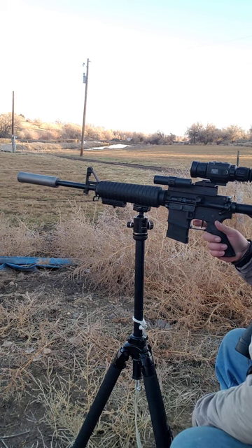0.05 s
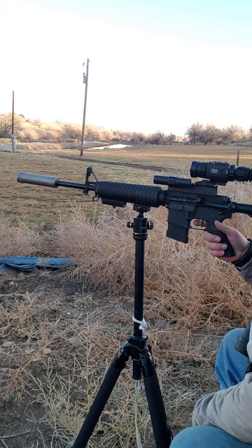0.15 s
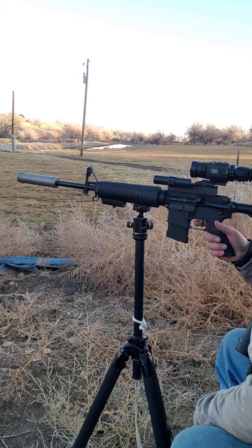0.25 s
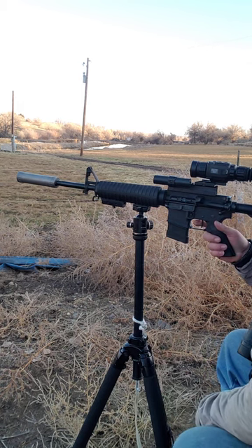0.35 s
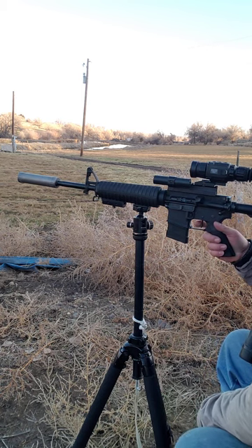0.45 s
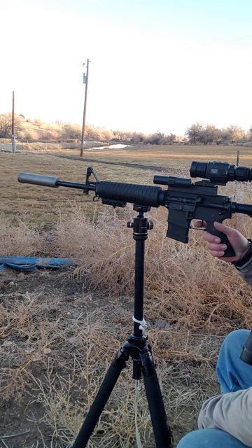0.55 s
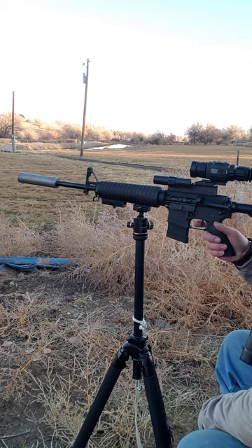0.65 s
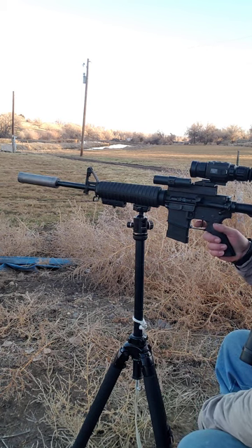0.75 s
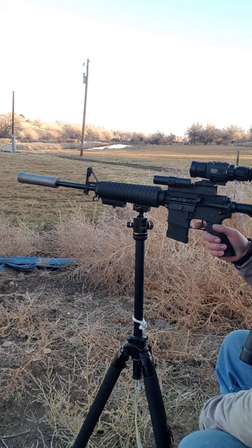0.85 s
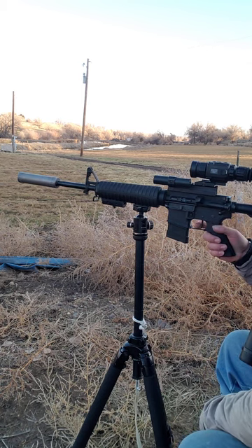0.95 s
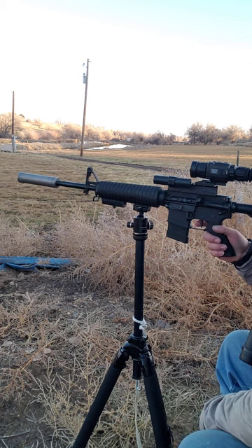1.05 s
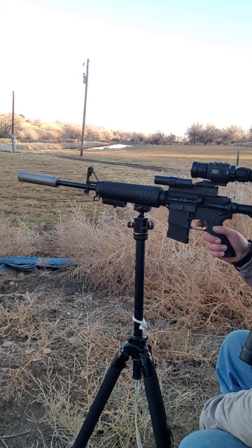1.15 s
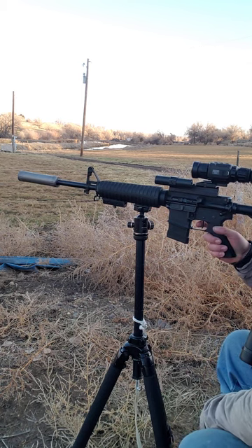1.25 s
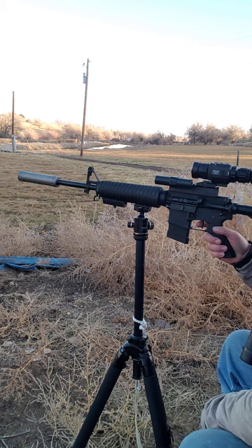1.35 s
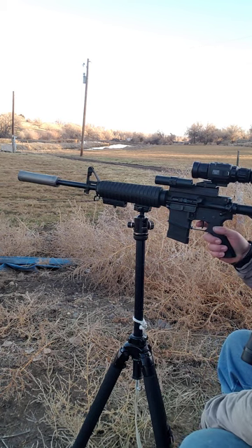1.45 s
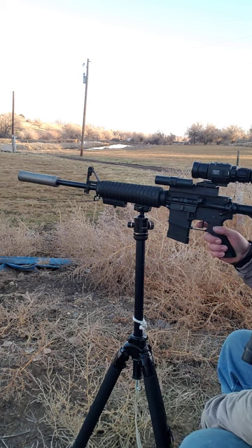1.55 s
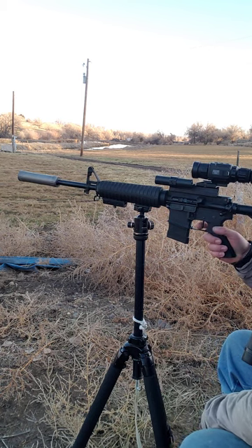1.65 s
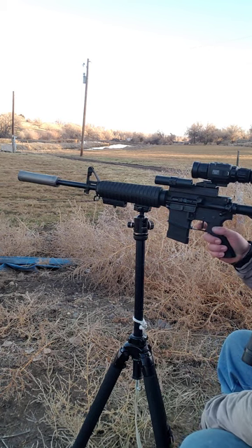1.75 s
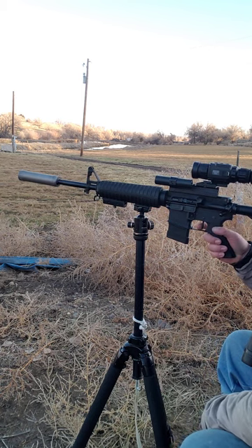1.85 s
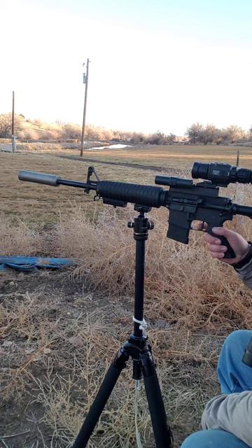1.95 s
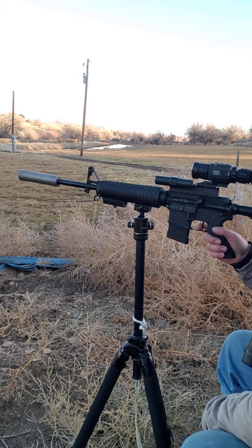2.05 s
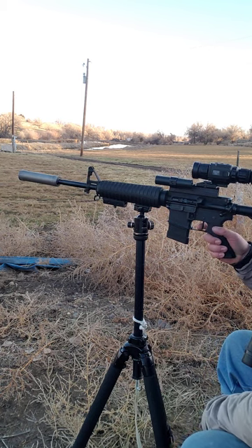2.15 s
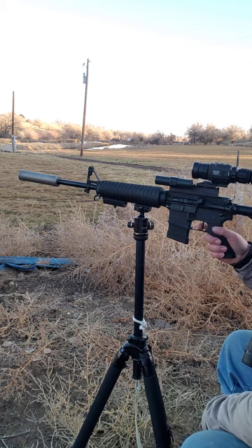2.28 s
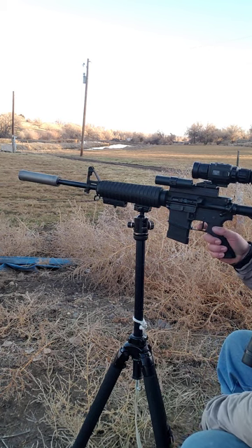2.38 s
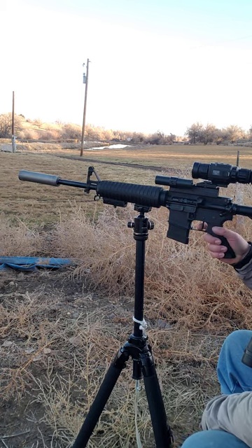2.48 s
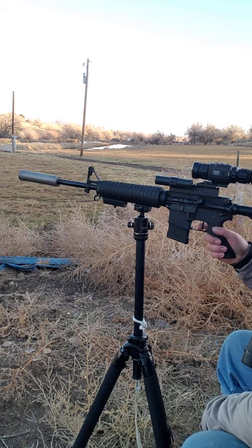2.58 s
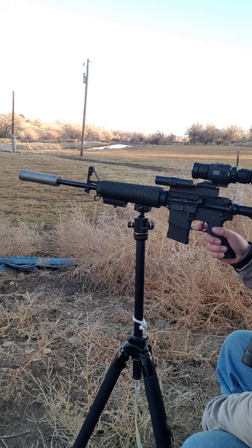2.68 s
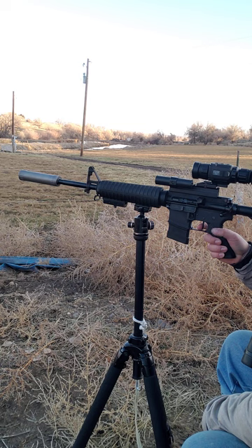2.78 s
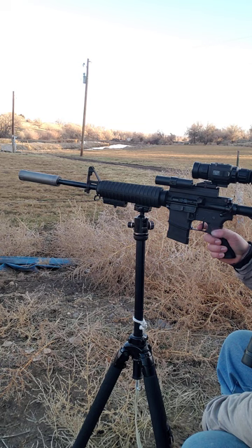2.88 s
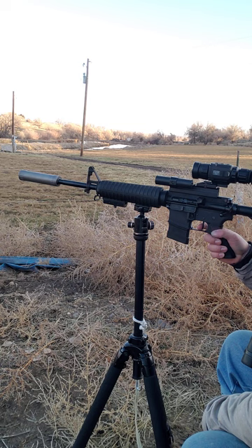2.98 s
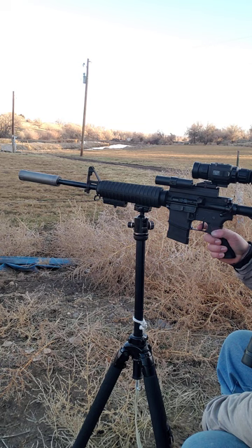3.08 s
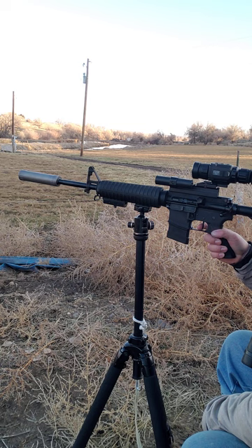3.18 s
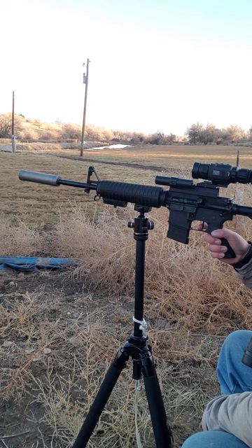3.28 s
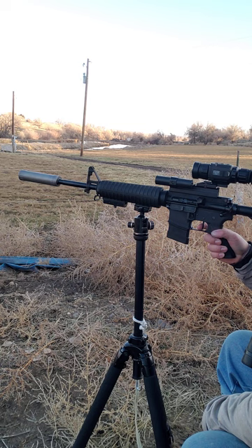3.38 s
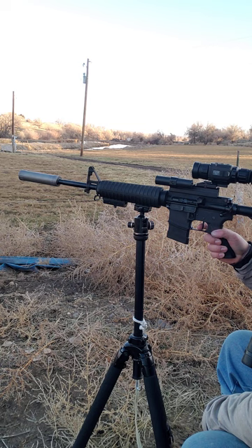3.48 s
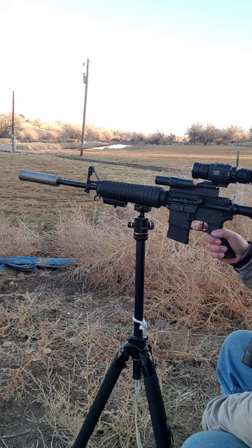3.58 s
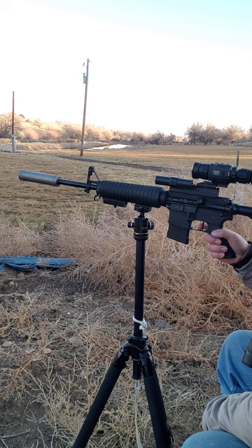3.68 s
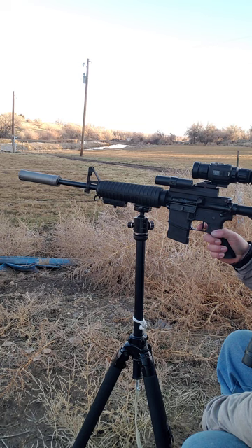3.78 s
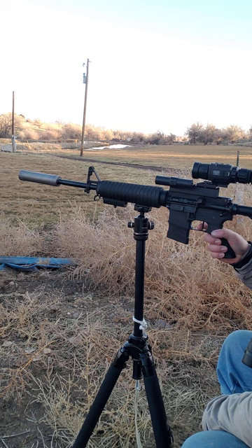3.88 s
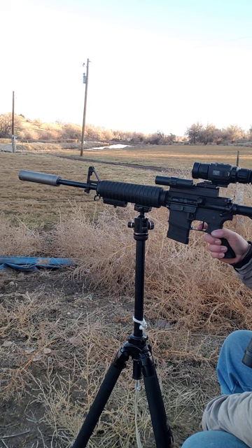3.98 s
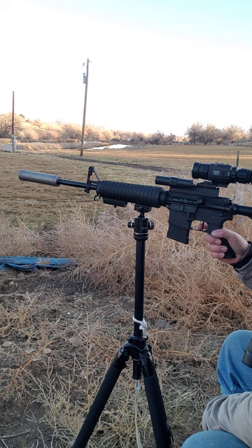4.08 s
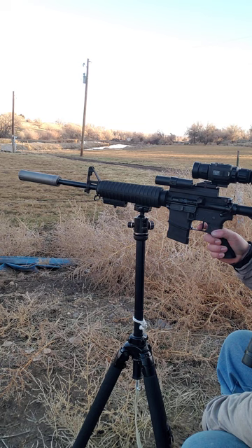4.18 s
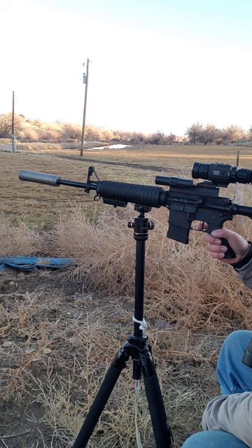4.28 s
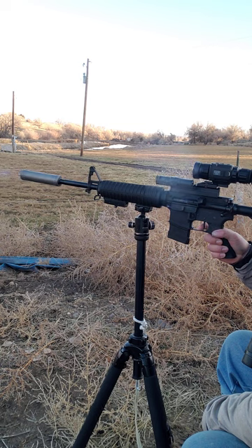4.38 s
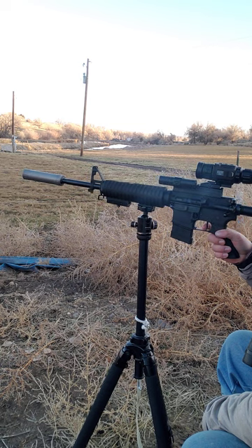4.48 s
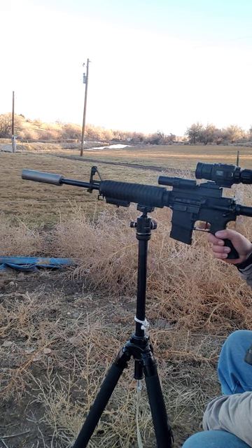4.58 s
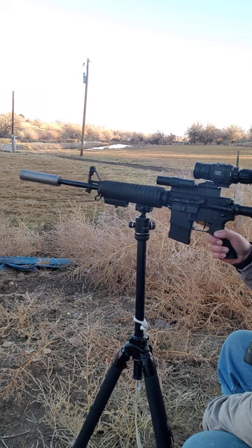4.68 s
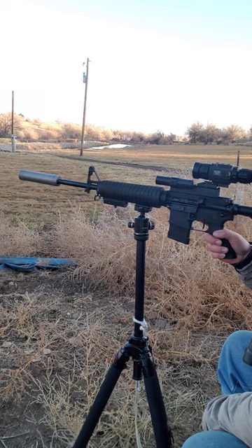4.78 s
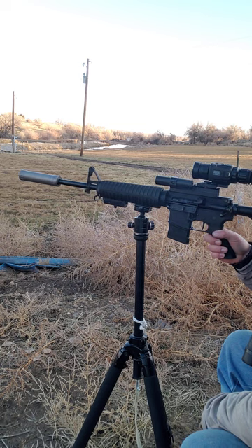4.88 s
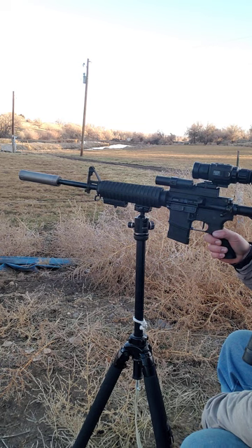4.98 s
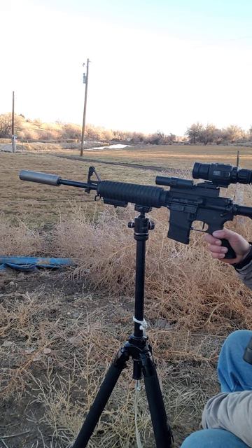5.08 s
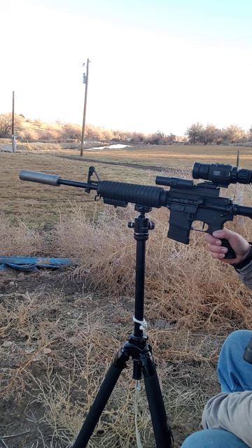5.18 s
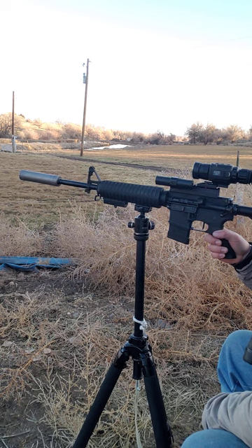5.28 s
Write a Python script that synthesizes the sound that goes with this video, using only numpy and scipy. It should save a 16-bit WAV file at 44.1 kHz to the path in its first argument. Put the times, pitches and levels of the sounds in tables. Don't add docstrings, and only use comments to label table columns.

```python
import sys
import numpy as np
from scipy import signal
from scipy.fft import irfft
from scipy.io import wavfile
from scipy.ndimage import uniform_filter1d

SR = 44100
rng = np.random.default_rng(int(sys.argv[2]) if len(sys.argv) > 2 else 0)


def materialize(psi):
    bounded = np.clip(np.atleast_2d(psi).T, -1, 1)
    quanta = np.round(bounded * 32767).astype(np.int16)
    wavfile.write(sys.argv[1], SR, quanta)


N = 235475
SHOT_S = 4.452


def undb(db):
    return 10 ** (np.asarray(db) / 20)


def read(points, hz):
    f, value = np.transpose(points)
    return np.interp(np.log(hz + 1), np.log(f + 1), value)


def curve(rows, t):
    s, *columns = np.transpose(rows)
    return [np.interp(t, s, c) for c in columns]


def add(mix, s, sound):
    part = mix[:, round(s * SR):][:, :sound.shape[-1]]
    part += sound[..., :part.shape[-1]]


def drift(t, top_hz):
    f = np.geomspace(.2, top_hz, num=24)[:, None]
    x = (np.sin(2 * np.pi * (f * t + rng.random(f.shape))) / np.sqrt(f)).sum(0)
    return x / x.std()


def pair(shape, same, lean_db):
    a, b, c, d = rng.standard_normal((4, *shape))
    same = np.clip(same, -1, 1)
    shared, own = a + 1j * b, c + 1j * d
    left = shared * undb(lean_db / 2)
    right = (same * shared + np.sqrt(1 - same ** 2) * own) / undb(lean_db / 2)
    return np.array([left, right])


# (frequency [Hz], correlation [-1 to 1])
COHERENCE = [(60, 0.98), (300, 0.94), (700, 0.85), (1500, 0.81), (2500, .2), (3500, -.2), (5000, -.1),
             (9000, -0.098)]


def field(colour_db, lean, size, patchy_db):
    hz = np.fft.rfftfreq(size, 1 / SR)[:, None]
    t = np.arange(4 * N // size + 5) * size / 4 / SR
    patches = rng.standard_normal((len(hz), len(t)))
    patches = uniform_filter1d(patches, size=size // 64, axis=0)
    patches = uniform_filter1d(patches, size=8192 // size, axis=1)
    gain = undb(colour_db(hz, t) + patchy_db * patches / patches.std())
    z = pair(patches.shape, read(COHERENCE, hz), read(lean, hz)) * gain
    return signal.istft(z * np.sqrt(3 / size), nperseg=size, noverlap=size * 3 // 4)[1][:, :N]


def unit(points, hz):
    db = read(points, hz)
    return db - 10 * np.log10(np.mean(undb(2 * db)))


def puff(colour_db, same, lean_db, db, rise, t60):
    t = np.arange(8192) / SR
    x = irfft(pair((4097,), same, lean_db) * undb(colour_db))
    decay = undb(db - 60 * np.maximum(t - rise, 0) / t60)
    attack = np.sin(np.pi / 2 * np.minimum(t / rise, 1)) ** 2
    return decay * attack * x / x.std()


def ring(modes, lean_db):
    t = np.arange(SR // 3) / SR
    out = np.zeros((2, len(t)))
    lean = np.array([[lean_db], [-lean_db]]) / 2
    for hz, db, t60 in modes:
        out += undb(db - 60 * t / t60 + lean) * np.sin(2 * np.pi * (hz * t + rng.random((2, 1))))
    return out * np.minimum(t / .001, 1)


# (frequency [Hz], left minus right [dB])
SHOT_LEAN = [(300, 0.5), (3000, 4), (7500, -2.5), (10000, -1), (15500, -5)]


def bands(events):
    out, hz = np.zeros((2, N)), np.fft.rfftfreq(8192, 1 / SR)
    for s, db, rise, t60, centre_hz, octaves, lean_db in events:
        colour_db = -6.5 * (np.log2((hz + 1) / centre_hz) / octaves) ** 2
        add(out, s, puff(colour_db, read(COHERENCE, hz), lean_db + read(SHOT_LEAN, hz), db, rise, t60))
    return out


# (frequency [Hz], density [dB per Hz])
WASH = [(150, -29), (260, -3), (400, -8.5), (550, -16), (800, -5), (1500, -6.5), (1900, -25.5),
        (2350, -10.5), (2800, -30.5), (3500, -29), (5000, -38), (7800, -33.5), (8250, -46), (12200, -33.5)]
# (time [s], level [dB])
ROAD = [(0, -61.5), (.45, -62), (1.1, -63), (1.7, -63.5), (2.3, -60.5), (2.8, -59.5), (3.3, -59.5),
        (3.55, -62), (3.8, -60.5), (4.43, -62)]
# (frequency [Hz], left minus right [dB])
HISS_LEAN = [(100, 4.5), (1700, -1.5), (3000, -1.5), (6000, 3), (7600, 20), (8300, 2), (15000, -2)]
# (time [s], half length [s], tyre drone [dB])
LORRIES = [(0, 0.13, 5.5), (.55, 0.34, -5.5), (1.85, 0.36, 6.5), (2.8, 0.52, 5), (3.848, 0.45, 11.5),
           (4.401, 0.25, 8)]
# (time [s], level [dB])
CHORUS = [(0, 5), (1.78, 5.5), (2.75, 3), (3.35, 2.5), (4.1, 2.5)]
DRONE_DB = -6.5
TILT_START_DB, BRIGHTEN_DB_PER_S = -1.98, 0.65
INSECT_DB, CHORUS_FADE_S = 1.5, .6


def wash():
    def colour_db(hz, t):
        tilt_db = TILT_START_DB + BRIGHTEN_DB_PER_S * t
        drone_db = DRONE_DB + sum(db * np.exp(-((t - s) / half) ** 2) for s, half, db in LORRIES)
        insect_db = INSECT_DB + sum(db * (t > s) * np.exp(-abs(t - s) / CHORUS_FADE_S) for s, db in CHORUS)
        swell_db = curve(ROAD, t)[0] + 62.34 + 0.65 * drift(t, top_hz=8)
        swell_db = swell_db + tilt_db * np.log2((hz + 1) / 1100)
        swell_db = swell_db + drone_db * np.exp(-((hz - 280) / 130) ** 2)
        road_db = swell_db / (1 + (hz / 3000) ** 4)
        return unit(WASH, hz) - 63 + road_db + insect_db * np.exp(-((hz - 7200) / 900) ** 2)
    return field(colour_db, HISS_LEAN, size=1024, patchy_db=0.5)


# (time [s], length [s], start [Hz], end [Hz], level [dB])
BIRDS = [(1.849, 0.14, 2260, 2350, -78.5), (2.054, 0.14, 2420, 2390, -77), (2.14, 0.17, 2250, 2030, -74),
         (2.556, 0.12, 2360, 2330, -70), (2.647, 0.18, 2300, 2204, -71.5), (3.081, .2, 2096, 2064, -73),
         (3.259, 0.087, 1560, 1544, -67), (3.307, .12, 2310, 2420, -84), (3.659, 0.16, 2395, 2390, -70.5),
         (3.82, 0.11, 2300, 2140, -84), (4.07, 0.14, 2420, 2430, -79.5), (4.147, 0.17, 2200, 2196, -74),
         (4.239, 0.12, 2300, 2250, -83), (4.334, 0.084, 2270, 2160, -83)]


def birds():
    out = np.zeros((2, N))
    lowpass = signal.butter(2, 42, fs=SR, output="sos")
    for s, length, start_hz, end_hz, db in BIRDS:
        t = np.arange(0, length, 1 / SR)
        paths = signal.sosfilt(lowpass, pair((len(t) + 2000,), 0.7, 0))[:, 2000:]
        flutter = 1.03 + paths / paths.std()
        tone = np.exp(2j * np.pi * np.cumsum(np.linspace(start_hz, end_hz, len(t))) / SR)
        add(out, s, undb(db + 2.0) * np.hanning(len(t)) ** 0.35 * (flutter * tone).real)
    return out


# (time [s], level [dB], t60 [s], centre [Hz], width [octaves])
RUSTLES = [(0, -66, .018, 3500, 2.4), (.023, -59.5, 0.08, 6500, .32), (.0235, -57, .065, 13000, .23),
           (.03, -70, 0.48, 5900, 1.9), (.272, -37.5, .09, 75, 0.33), (1.488, -77, .15, 3300, .3),
           (1.49, -76.5, .13, 5700, .25)]
# (time [s], level [dB], left minus right [dB])
TICKS = [(.594, -74, 2), (.617, -75, 4), (.657, -76.5, 0), (.682, -75.5, 0), (.729, -76, 6),
         (1.835, -75, 8)]
# (rise [s], t60 [s], centre [Hz], width [octaves])
TICK = (.0011, .018, 5700, .25)
RUSTLE_RISE, RISE_CYCLES, RUSTLE_LEAN_DB = 0.021, 1.4, -3


def rustles():
    events = [(s, db, *TICK, lean_db) for s, db, lean_db in TICKS]
    for s, db, t60, hz, octaves in RUSTLES:
        rise = RUSTLE_RISE * t60 + RISE_CYCLES / hz
        events.append((s, db, rise, t60, hz, octaves, RUSTLE_LEAN_DB))
    return bands(events)


# (time [s], level [dB])
IDLE = [(0, -40.5), (.07, -41.5), (.84, -42.5), (1.47, -43.5), (1.78, -41), (3.28, -41), (4.42, -39.5)]
# (multiple of the cycle rate [-], level [dB])
FIRING = [(3, -31), (4, -14), (5, -20.5), (6, -22.5), (7, -17.5), (8, -1.5), (9, -16), (10, -25.5),
          (11, -20), (12, -7.5), (13, -14), (14, -20.5), (15, -31), (16, -37), (17, -39.5), (18, -33.5)]
# (frequency [Hz], density [dB per Hz])
RUMBLE = [(20, -23.5), (40, -11), (55, 1), (85, -5), (130, -9.5), (210, -10), (330, -29.5), (600, -71)]
RUMBLE_DB = -55
IDLE_HZ = 102.98


def engine():
    now, t = np.arange(N) / SR, np.arange(0, N + 64, 64) / SR
    turns = now * IDLE_HZ / 8
    tone = np.zeros(N)
    for order, order_db in FIRING:
        waver = np.interp(now, t, drift(t, top_hz=9)) * (.5 - .04 * order_db)
        slip = np.interp(now, t, drift(t, top_hz=6)) * (.004 - .0003 * order_db)
        shift = .42 * (order < 12 and order != 8)
        tone += undb(order_db + waver) * np.sin(2 * np.pi * (order * turns + slip + shift))

    def rumble_db(hz, s):
        return unit(RUMBLE, hz) + RUMBLE_DB + 1.2 * drift(s, top_hz=4)
    rumble = field(rumble_db, HISS_LEAN, size=4096, patchy_db=1.5)
    return np.sqrt(2) * undb(curve(IDLE, now)[0]) * tone * undb([[.3], [-.3]]) + rumble


# (frequency [Hz], density [dB per Hz])
NEAR = [(40, -21), (70, -4.5), (200, -1), (450, 1), (1260, -6.5), (2500, -2.5), (7000, -3.5), (8600, -20),
        (12200, -7.5), (15500, -5.5), (16500, -26.5)]
# (frequency [Hz], t60 [s])
NEAR_DECAY = [(100, 0.62), (300, 0.75), (1000, 0.43), (2000, .45), (6000, 0.41), (9000, 0.43), (12000, 0.4),
              (16000, 0.27)]
# (frequency [Hz], density [dB per Hz])
FAR = [(60, -39.5), (150, -5), (300, 0.5), (600, -9.5), (1200, -5.5), (2500, 1), (4000, -0.5),
       (7000, -11.5), (9000, -28), (12000, -26), (16000, -34)]
NEAR_DB = -36.5
TREES_DB, TREES_HOLD_S, TREES_FALL_DB_PER_S = -56, 0.66, 19
DIP_HZ, DIP_S, DIP_POWER = 970, 0.36, 0.83
DULL_DB_PER_KHZ_S = 3
DULL_TOP_HZ = 7500


def scatter():
    def near_db(hz, t):
        return unit(NEAR, hz) + NEAR_DB - 60 * np.maximum(t - 4.51, 0) / read(NEAR_DECAY, hz)

    def far_db(hz, t):
        late = np.maximum(t - SHOT_S, 0)
        db = TREES_DB - TREES_FALL_DB_PER_S * np.maximum(late - TREES_HOLD_S, 0)
        dip_hz = DIP_HZ * np.maximum(late / DIP_S, 1) ** -DIP_POWER
        dip_db = -13 * np.exp(-(np.log2((hz + 1) / dip_hz) / 0.54) ** 2)
        dull_db = DULL_DB_PER_KHZ_S * late * np.minimum(hz, DULL_TOP_HZ) / 1000
        return unit(FAR, hz) + db + dip_db - dull_db
    near = field(near_db, SHOT_LEAN, size=512, patchy_db=2.0)
    far = field(far_db, SHOT_LEAN, size=1024, patchy_db=2.5)
    return (near + far) * np.clip((np.arange(N) / SR - 4.455) / .02, 0, 1)


# (time [s], level [dB], t60 [s], centre [Hz], left minus right [dB])
ECHOES = [(4.548, -37.5, .07, 2600, 3), (4.577, -61, .06, 2800, 1), (4.608, -39, 0.067, 2070, -3),
          (4.712, -44, .044, 1950, -4), (4.7127, -60, 0.03, 8000, 5), (4.887, -52.5, .12, 2200, -2),
          (4.956, -53.5, .12, 2900, -1), (5.1, -59, 0.065, 2600, -1)]
# (time [s], level [dB], centre [Hz])
THUDS = [(4.6, -51.5, 155), (4.713, -52, 248), (4.935, -59.5, 287)]
# (time [s], level [dB], centre [Hz])
PINGS = [(4.826, -50.5, 3060), (4.845, -55, 2550)]
# (rise [s], t60 [s], width [octaves], left minus right [dB])
THUD = (.006, .14, .7, -4.5)
# (rise [s], t60 [s], width [octaves], left minus right [dB])
PING = (.005, .06, .04, 7)
ECHO_SMEAR, ECHO_OCTAVES, ECHO_NARROW_PER_S = 0.92, 1.2, 0.94


def echoes():
    events = []
    for s, db, t60, hz, lean_db in ECHOES:
        octaves = ECHO_OCTAVES - ECHO_NARROW_PER_S * (s - SHOT_S)
        events.append((s, db, ECHO_SMEAR * t60 ** 2, t60, hz, octaves, lean_db))
    for rows, (rise, t60, octaves, lean_db) in [(THUDS, THUD), (PINGS, PING)]:
        events += [(s, db, rise, t60, hz, octaves, lean_db) for s, db, hz in rows]
    return bands(events)


# (frequency [Hz], level [dB], t60 [s])
CASE = [(15050, -71, 0.4), (15062, -88, .25), (15710, -84, .1), (11600, -95, .08), (6950, -84, .05)]
CASE_S, CASE_TICK_DB = 5.082, -71


def brass():
    out = bands([(CASE_S, CASE_TICK_DB, .001, .02, 11000, .9, 3)])
    add(out, CASE_S, ring(CASE, lean_db=-5.0))
    return out


# (frequency [Hz], density [dB per Hz])
BLAST = [(88, -31), (150, -1), (355, -7.5), (946, -5.5), (1810, -13.5), (2150, -8), (2520, -13),
         (3730, -10), (6580, -17.5), (9730, -22), (10700, -12), (15000, -11.5), (16200, -20.5)]
# (frequency [Hz], density [dB per Hz])
BOLT = [(88, -33), (150, 1.5), (580, 1.5), (778, -5), (1150, -0.5), (1480, -5.5), (2030, -6.5),
        (3250, -8.5), (3730, -2.5), (7260, -1.5), (8490, -19.5), (15000, -7), (16200, -12.5)]


def bursts(events):
    out, hz = np.zeros((2, N)), np.fft.rfftfreq(8192, 1 / SR)
    for s, db, rise, t60, bolt_share, tilt_db, likeness, lean_db in events:
        colour_db = (1 - bolt_share) * unit(BLAST, hz) + bolt_share * unit(BOLT, hz)
        colour_db = colour_db + tilt_db * np.log2((hz + 1) / 3000)
        same = likeness * read(COHERENCE, hz)
        add(out, s, puff(colour_db, same, lean_db + read(SHOT_LEAN, hz), db, rise, t60))
    return out


# (time [s], level [dB], tilt [dB per octave], left minus right [dB])
GAS = [(4.4497, -30.5, -4.5, -9), (4.4524, -12, 1, 1.5), (4.456, -17.5, -2, -7.5),
       (4.4601, -16.5, 2.5, -2.5), (4.4636, -20, 1.7, -1)]
# (frequency [Hz], level [dB], t60 [s])
CAN = [(863, -21, 0.046), (1440, -19.5, .035), (2040, -32.5, 0.039)]
GAS_RISE_S, GAS_T60_S, GAS_LINGER = .0022, .024, 2.3
GAS_BOLT_SHARE, GAS_LIKENESS = .17, 0.26


def gas_blast():
    events = []
    for s, db, tilt_db, lean_db in GAS:
        t60 = GAS_T60_S + GAS_LINGER * (s - GAS[0][0])
        events.append((s, db, GAS_RISE_S, t60, GAS_BOLT_SHARE, tilt_db, GAS_LIKENESS, lean_db))
    out = bursts(events)
    add(out, 4.4528, ring(CAN, lean_db=-3.5))
    return out


# (time [s], level [dB], t60 [s], tilt [dB per octave], left minus right [dB])
ACTION = [(4.4457, -33, 0.0086, 0.5, 3), (4.4698, -18, 0.076, 2.5, -1), (4.479, -23, 0.075, 0.4, -6),
          (4.488, -29, .08, 3, 2), (4.5021, -19.5, 0.027, 3.5, 0), (4.507, -30, .06, 6, -1)]
# (frequency [Hz], level [dB], t60 [s])
STEEL = [(2939, -4.5, 0.13), (4630, -4, 0.094), (5000, 2, 0.051), (5572, -5.5, 0.12), (6430, -6.5, 0.17),
         (7600, -1, 0.066), (7700, -6.5, 0.19), (9975, -18.5, 0.12), (12270, -2, 0.065), (15070, -4, 0.15)]
STEEL_DB = -40.5
ACTION_RISE_S, ACTION_RISE = .0008, .022
ACTION_BOLT_SHARE, ACTION_LIKENESS = 0.99, 1


def bolt_action():
    events = []
    for s, db, t60, tilt_db, lean_db in ACTION:
        rise = ACTION_RISE_S + ACTION_RISE * t60
        events.append((s, db, rise, t60, ACTION_BOLT_SHARE, tilt_db, ACTION_LIKENESS, lean_db))
    out = bursts(events)
    for s, db in [(4.472, 3), (4.503, .1)]:
        add(out, s, undb(STEEL_DB + db) * ring(STEEL, lean_db=-1.2))
    return out


# (time [s], frequency [Hz], t60 [s], left [dB], right [dB])
PUSH = [(4.453, 420, 0.035, -21, -21.5), (4.4565, 260, 0.034, -23, -43), (4.459, 270, 0.051, -43.5, -23.5),
        (4.4568, 110, 0.053, -21.5, -20), (4.4675, 54, 0.07, -17, -34)]


def air_push():
    out, t = np.zeros((2, N)), np.arange(8192) / SR
    for s, hz, t60, *db in PUSH:
        add(out, s, undb(np.array(db)[:, None] - 60 * t / t60) * np.sin(2 * np.pi * hz * t))
    return out


def rifle():
    return gas_blast() + bolt_action() + air_push()


GAIN_DB, DUCK_FALL_S, DUCK_DB, OVERSHOOT_DB, RECOVER_S = 1.07, .018, -29.5, -7, .15


def duck():
    t = np.arange(N) / SR - SHOT_S + .01
    fall = np.clip(t / DUCK_FALL_S, 0, 1)
    return undb(GAIN_DB + fall * (DUCK_DB + OVERSHOOT_DB * np.exp(-np.maximum(t, 0) / RECOVER_S)))


def scene():
    shot = scatter() + echoes() + brass() + rifle()
    return wash() + birds() + rustles() + engine() + shot / duck()


def band_limit(x):
    return signal.sosfilt(signal.butter(12, 16830, fs=SR, output="sos"), x)


OVERLOAD = .95


def record(dry):
    heard = signal.sosfilt(signal.butter(2, 30, "high", fs=SR, output="sos"), dry)
    ducked = OVERLOAD * np.tanh(heard * duck() / OVERLOAD)
    edge = signal.firwin(255, 16300, window=("kaiser", 8), fs=SR)
    return band_limit(signal.oaconvolve(ducked, edge[None], "same"))


dry = scene()
out = record(dry)
materialize(out)
```